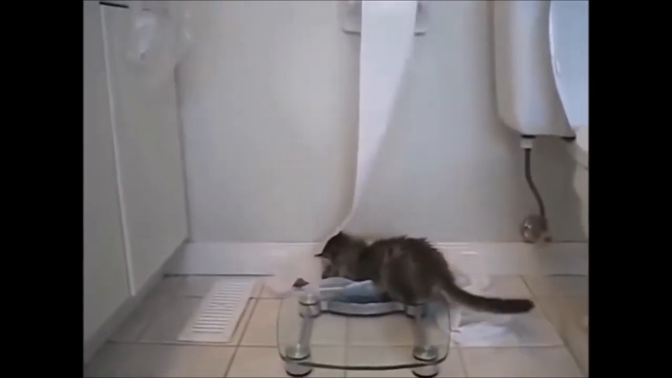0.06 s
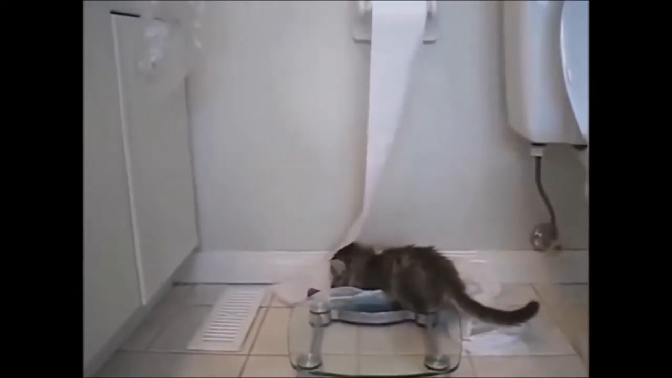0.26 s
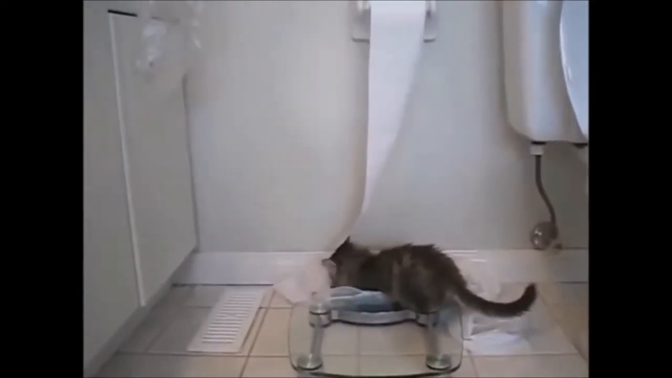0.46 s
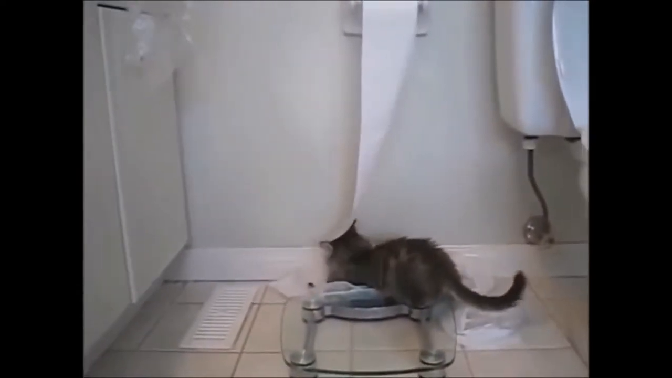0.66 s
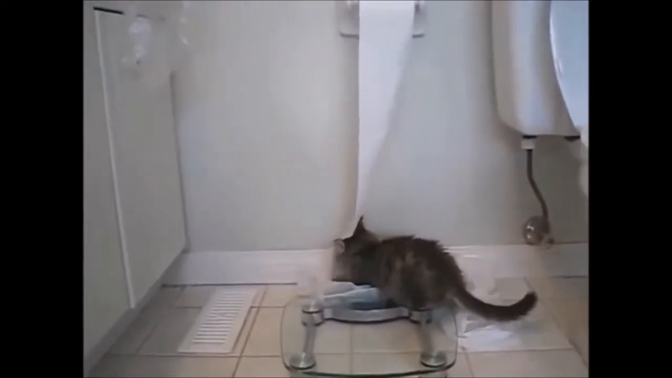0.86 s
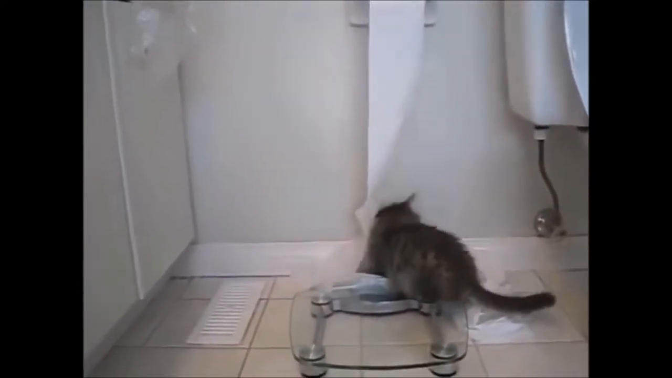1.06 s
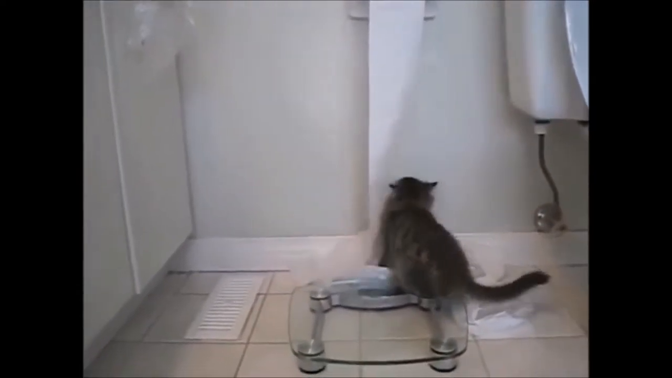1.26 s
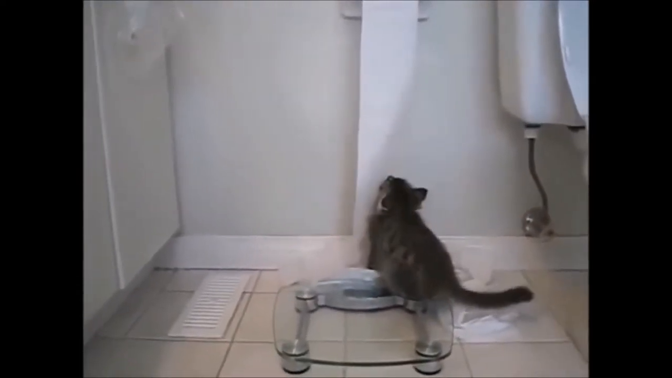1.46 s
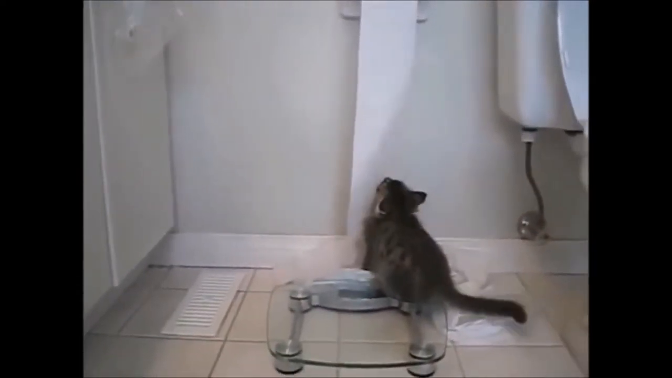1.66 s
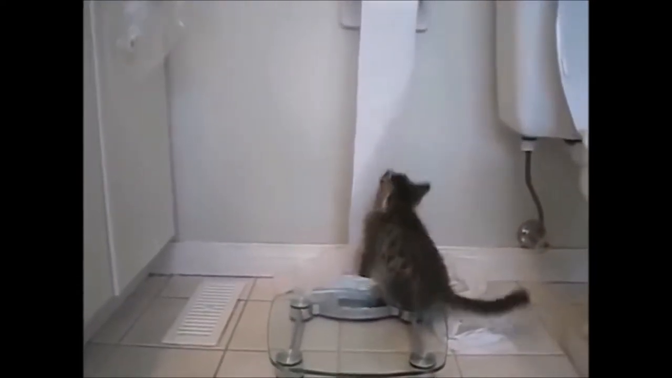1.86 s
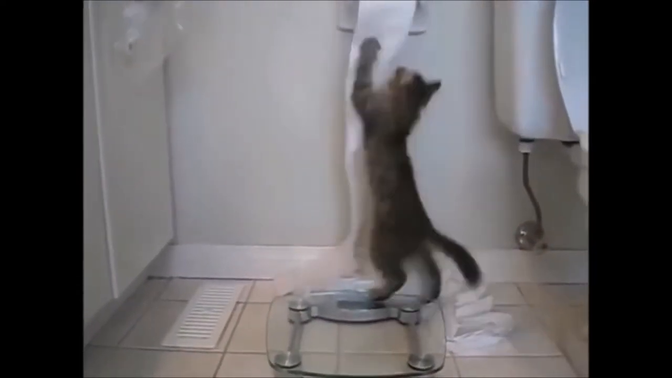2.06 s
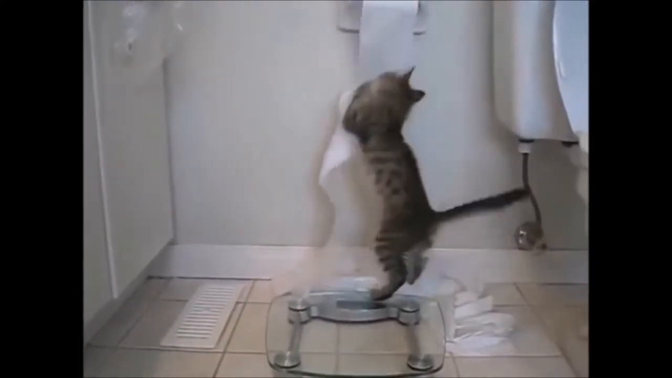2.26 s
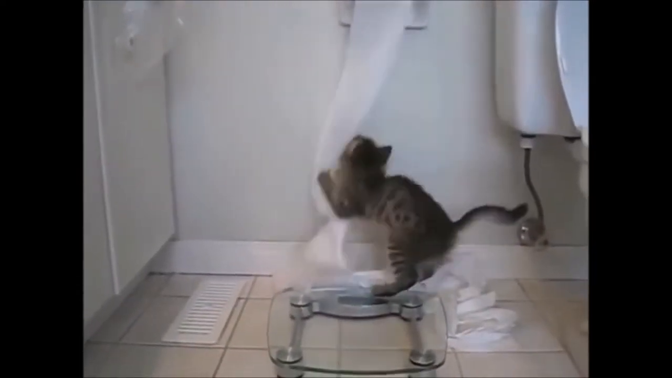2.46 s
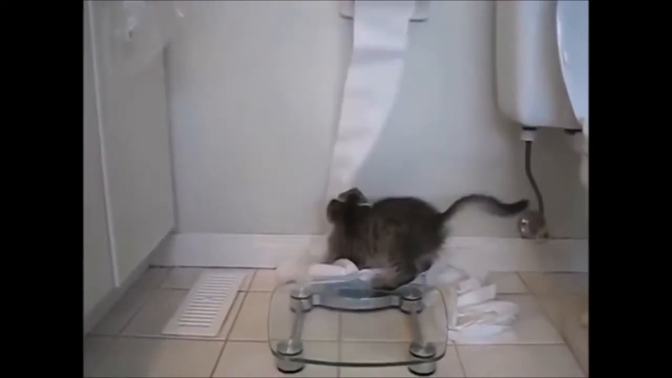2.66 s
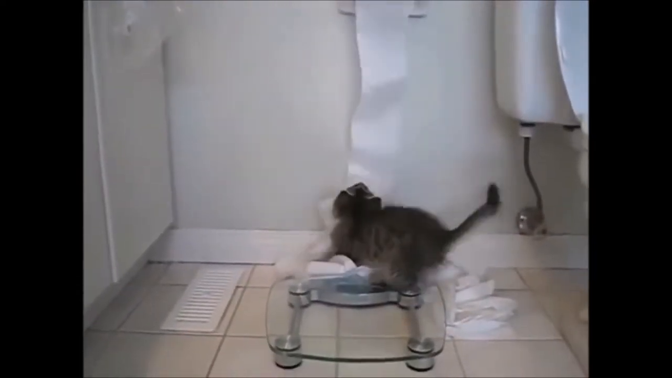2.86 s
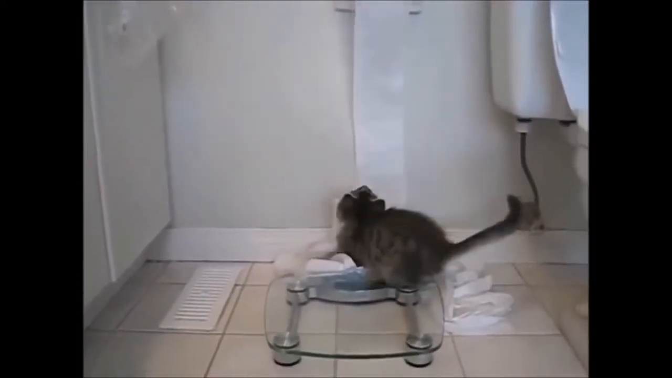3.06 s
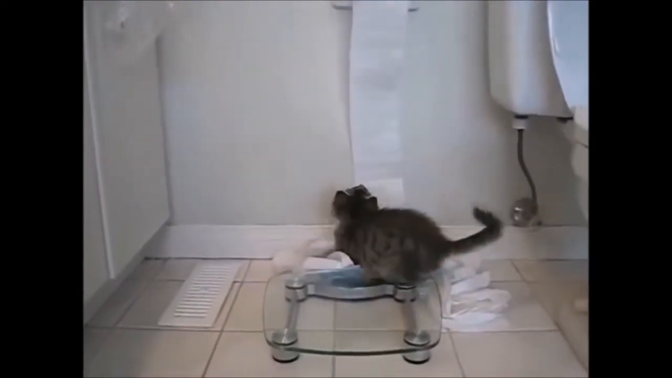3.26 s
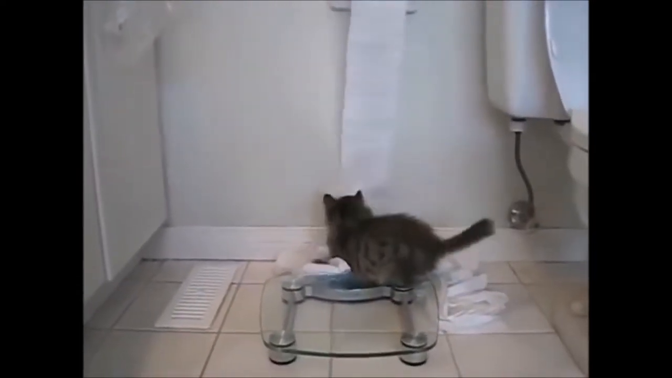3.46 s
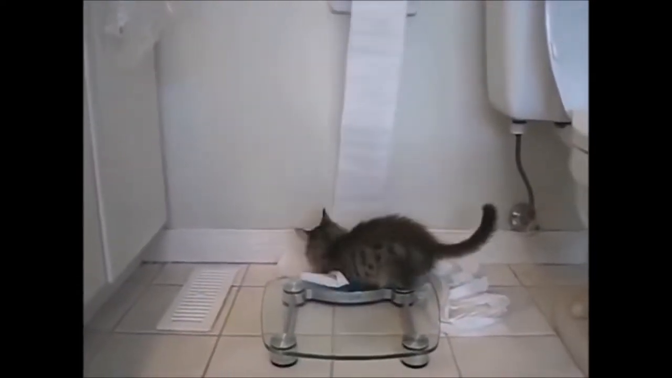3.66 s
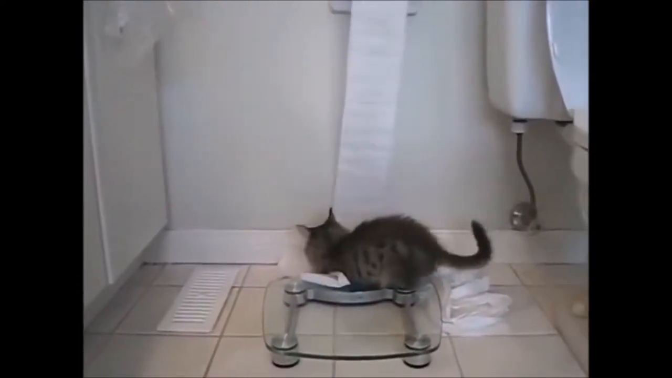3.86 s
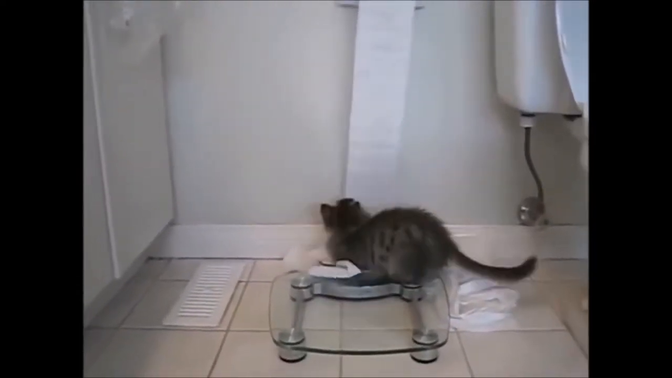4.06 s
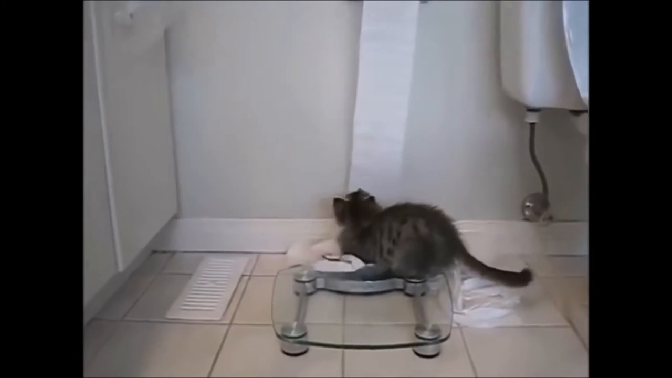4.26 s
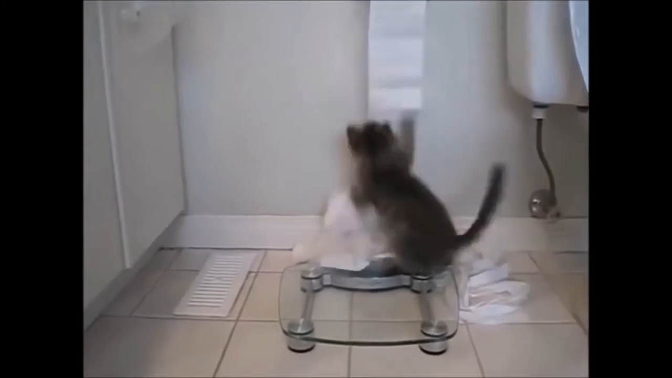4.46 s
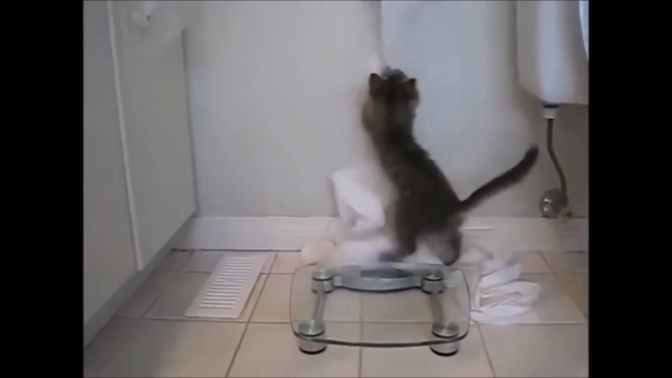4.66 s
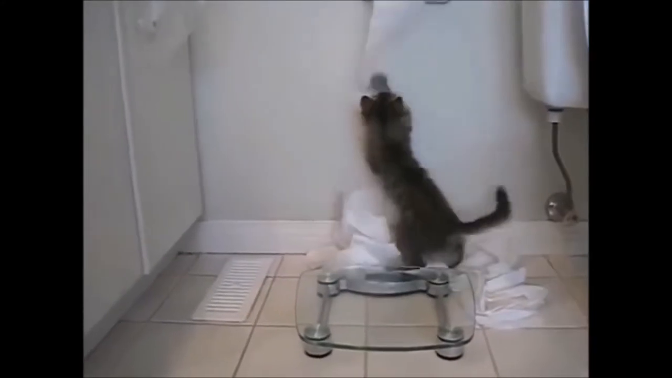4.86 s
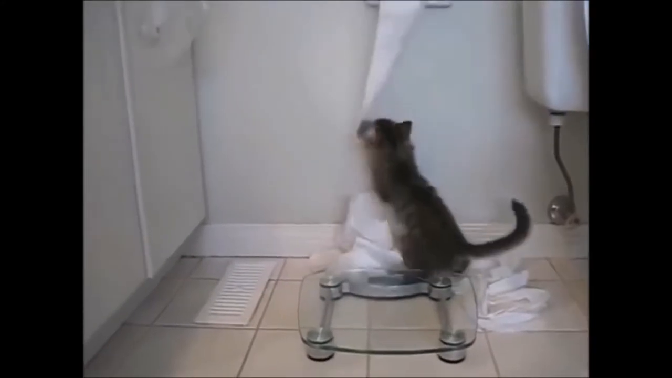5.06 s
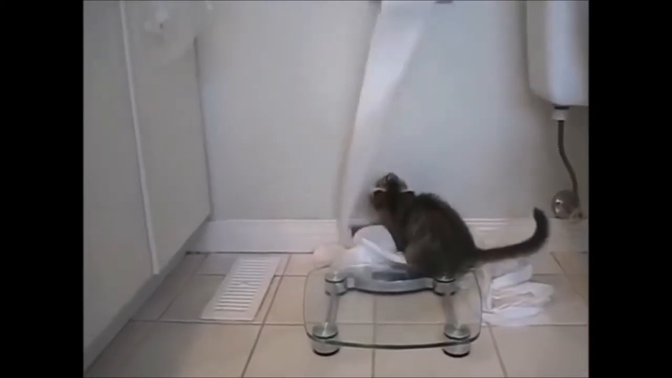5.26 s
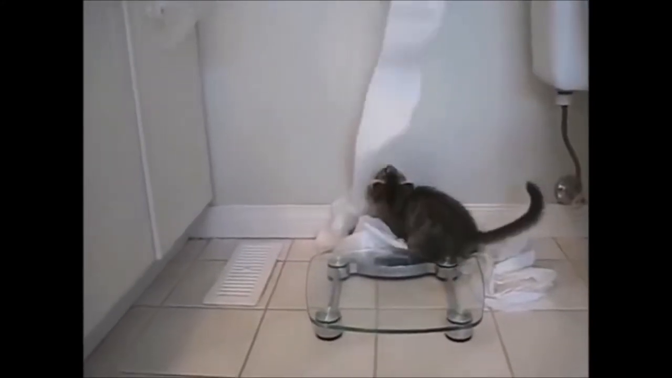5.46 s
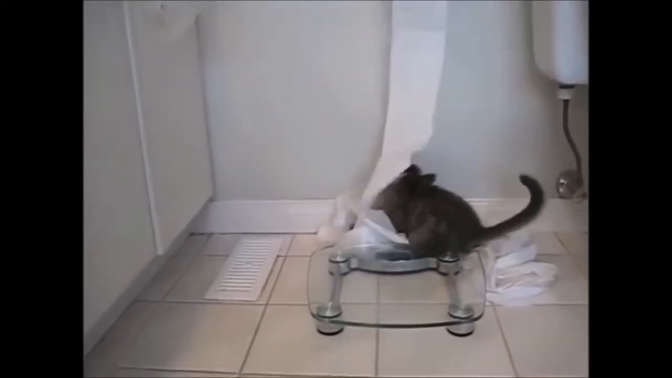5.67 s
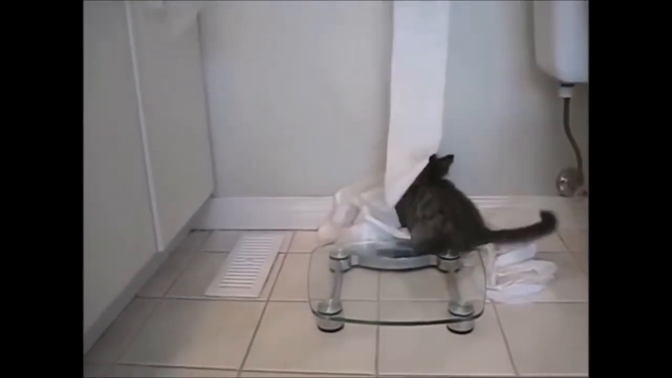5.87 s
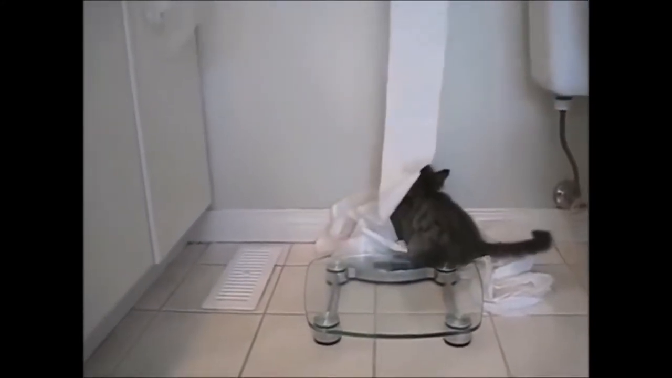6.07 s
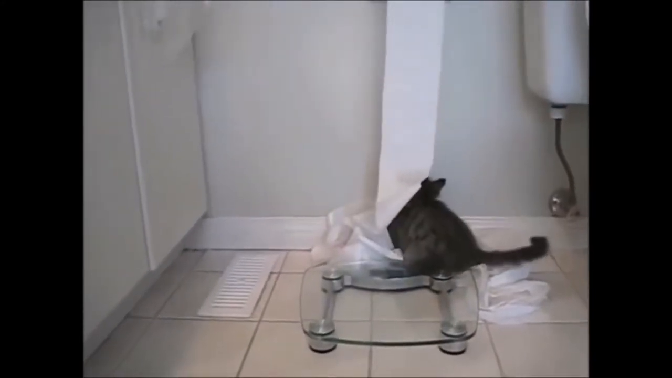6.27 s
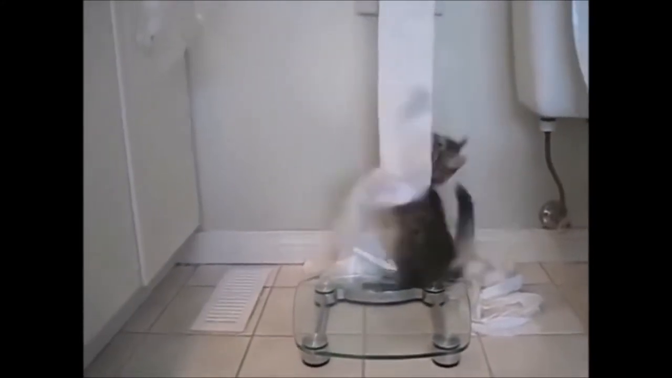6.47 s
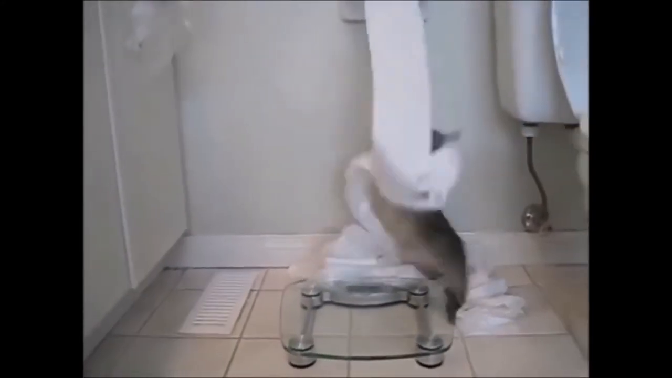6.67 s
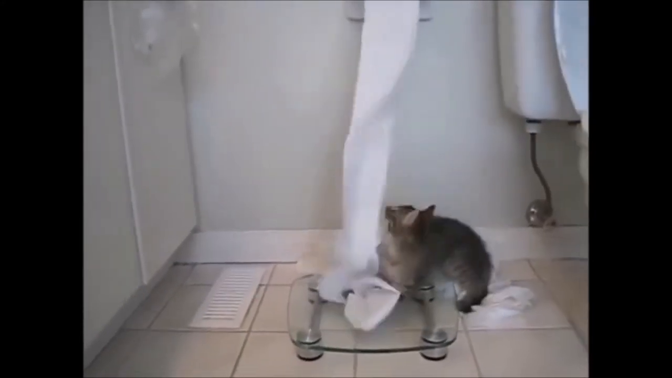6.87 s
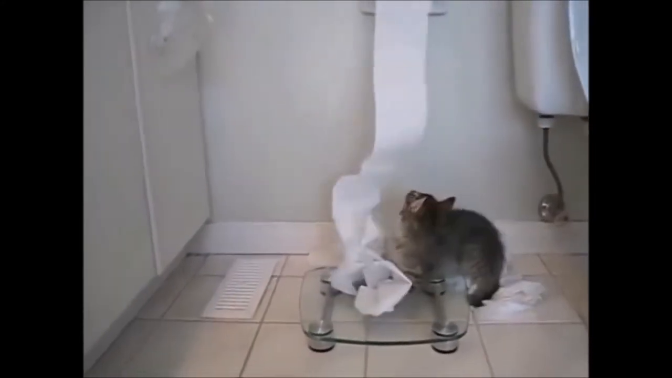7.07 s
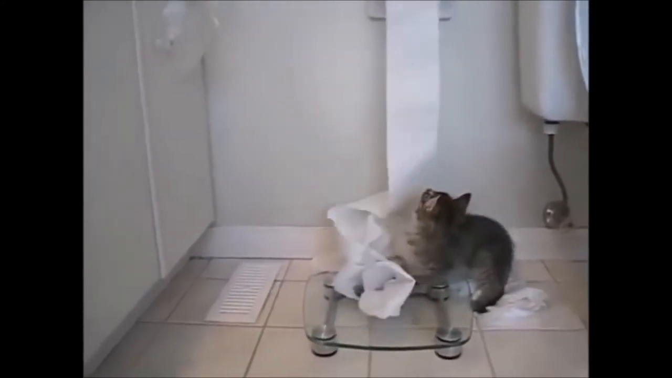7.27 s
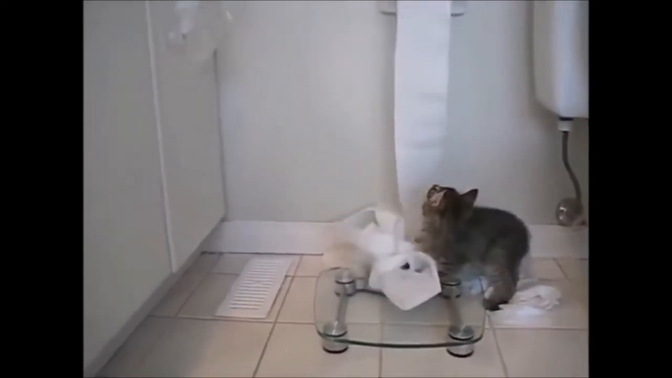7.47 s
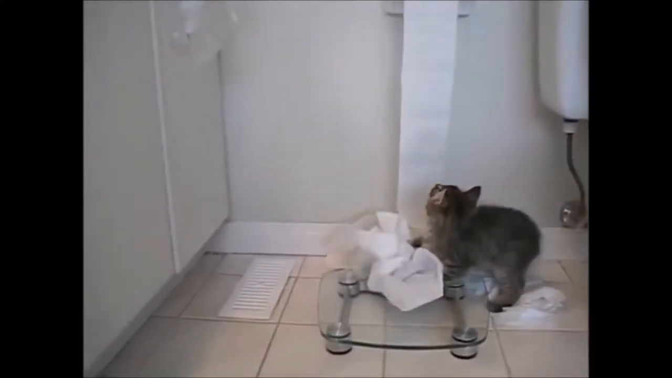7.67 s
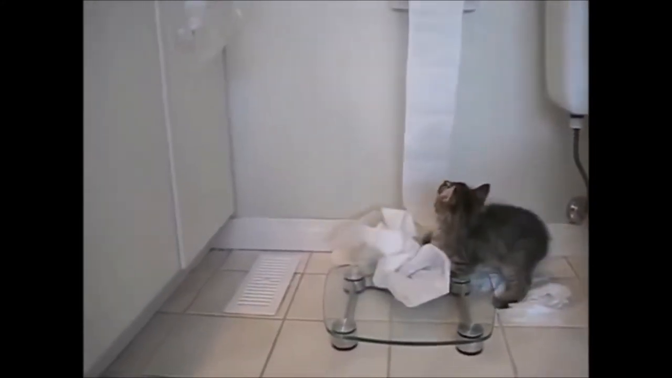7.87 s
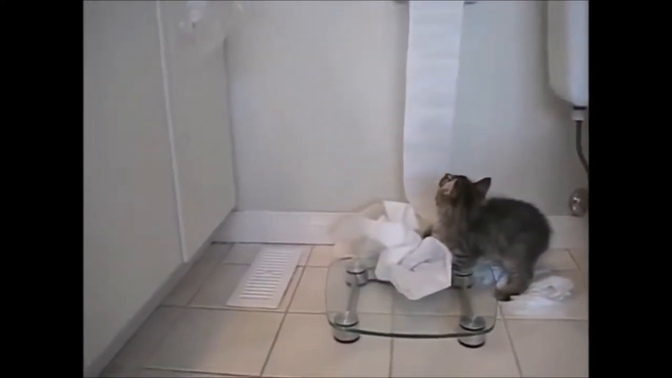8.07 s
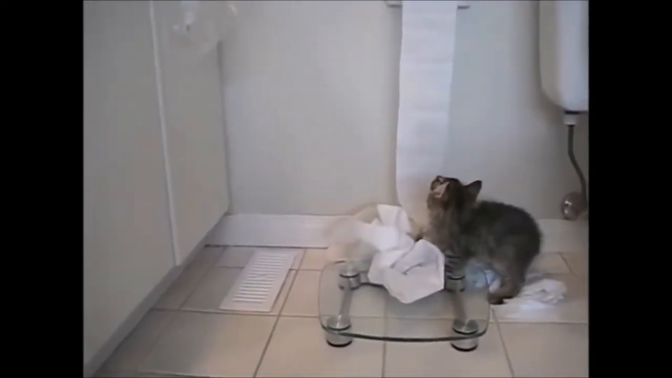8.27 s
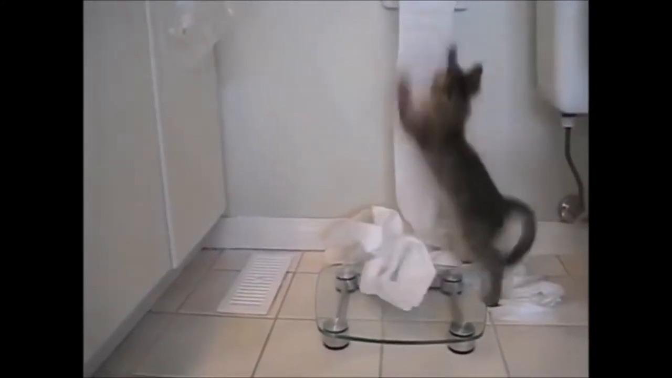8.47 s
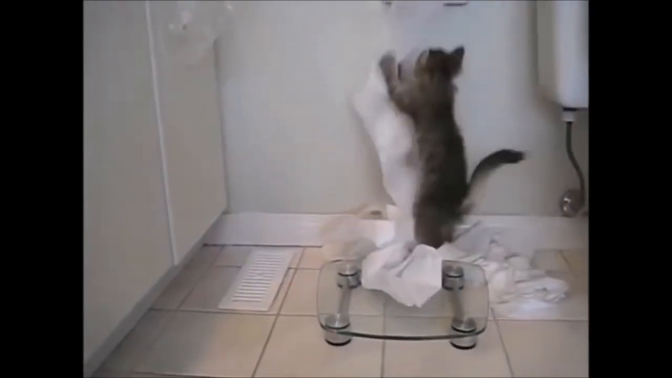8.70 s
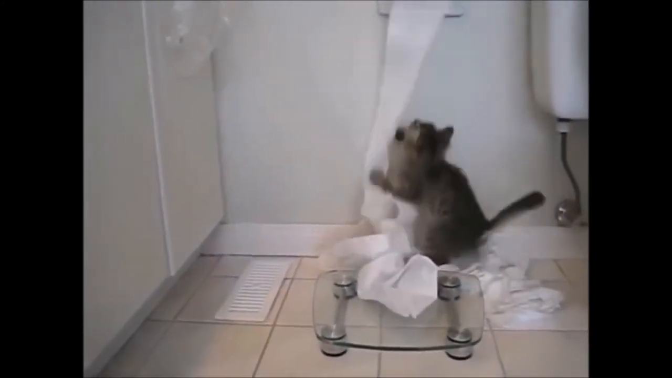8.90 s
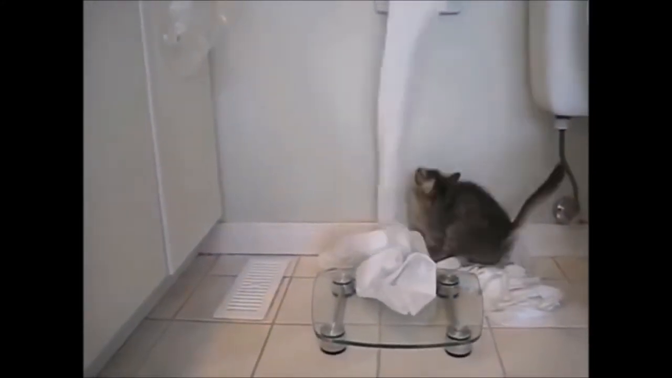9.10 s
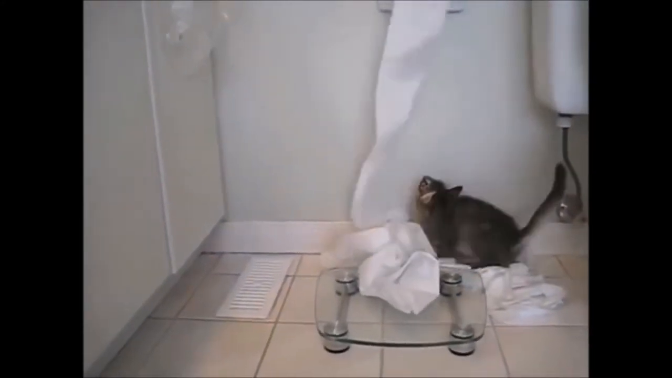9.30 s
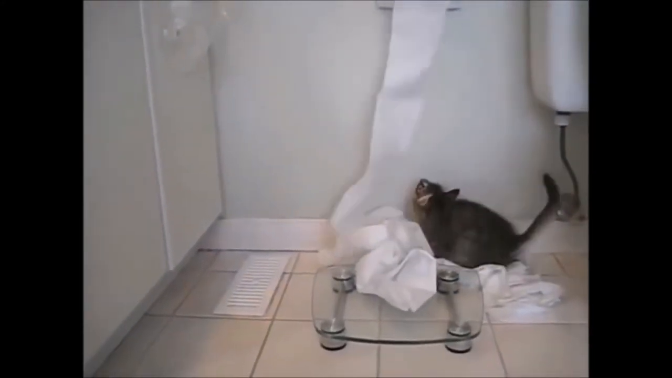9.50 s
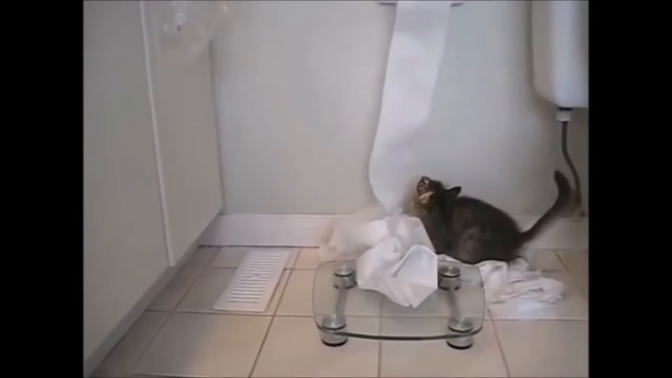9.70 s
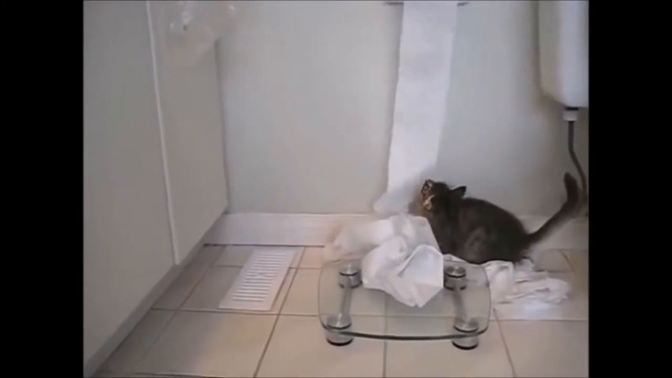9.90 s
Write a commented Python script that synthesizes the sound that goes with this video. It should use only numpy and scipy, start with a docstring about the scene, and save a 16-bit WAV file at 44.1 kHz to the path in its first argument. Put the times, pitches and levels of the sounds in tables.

```python
"""Kitten and toilet roll

A kitten claws toilet paper off its roll in a small tiled bathroom, in mono: filtered noise slides and crinkles
as tissue. At each leap the roll spins and rumbles as lumpy low noise; it knocks, and claws tick on a glass
scale, as dying flurries of clicks. Cardboard and taut paper pop as single decaying sines. Near 7 s a metal
fitting is struck and rings as a sum of modes. Soft paw thuds, a brief faint whine, hiss and a whirr are noise."""
import sys
import numpy as np
from scipy import signal
from scipy.fft import rfft, irfft, next_fast_len
from scipy.io import wavfile
from scipy.ndimage import uniform_filter1d

SR = 44100
rng = np.random.default_rng(int(sys.argv[2]) if len(sys.argv) > 2 else 0)


def dump(signal):
    """Clip the signal to [-1, 1] and save it as 16-bit WAV at the path in sys.argv[1]."""
    limited = np.clip(np.atleast_2d(signal).T, -1, 1)
    pcm = np.round(limited * 32767).astype(np.int16)
    wavfile.write(sys.argv[1], SR, pcm)


N = 438354
TIME, FREQ = np.arange(N) / SR, np.fft.rfftfreq(N, 1 / SR)
STEPS = TIME[::40]  # coarse time grid for slow controls, s

# The effort and fold of a gentle stroke, to which the others are compared
GENTLE_DB, FOLD_HZ = -48, 3000

# Spectrum of rubbed tissue: f/Hz, relative level/dB
TISSUE_SPECTRUM = [(150, -23), (250, -10), (319, -6.5), (493, -4.5), (607, -2), (686, -5), (775, -2),
                   (1220, 0), (1350, 1.5), (1580, -0.5), (2020, 0), (3840, -1.5), (12100, -2), (16000, -11)]
BODY_DB, BODY_DB_PER_OCTAVE = -9.5, -8.5  # body against hiss: a tighter, higher fold sounds thinner


def paper(slide_db=-2, crinkle_db=-8, clump_db=3.0, flutter_db=1.27, unrest=0.078, crisp=0.21,
          snap_db=-7, feed_hiss_db=-7, feed_body_db=-7):
    """Friction noise: fibres slide with a fluttering hiss, crinkle and snap; the turning roll feeds a swish."""
    drag, octaves, fizziness = pull()
    feed = spin()
    rub = np.hypot(drag, amp(feed_hiss_db) * feed)
    effort_db = 20 * np.log10(rub) - GENTLE_DB

    # Harder rubbing flutters more and crinkles louder
    slide = rng.standard_normal(N)
    slide *= amp(np.maximum(flutter_db + unrest * effort_db, 0) * wander(per_s=60))
    crinkle = unit(crackle(per_s=3500, spread_db=2) * amp(clump_db * wander(per_s=130)))
    snaps = amp(snap_db) * crackle(per_s=70, spread_db=3.5)
    drive = slide + (crinkle + snaps) * amp(crinkle_db + crisp * effort_db)

    patched = patches(drive, patchy_db=2.5, centre_hz=FOLD_HZ * 2 ** octaves, favour_db=2.5)
    body, hiss, fizz = registers(patched, TISSUE_SPECTRUM)
    drag_body = drag * amp(BODY_DB + BODY_DB_PER_OCTAVE * octaves)
    body *= np.hypot(drag_body, amp(feed_body_db) * feed)
    fizz *= drag * fizziness
    return amp(slide_db) * (body + rub * hiss + fizz)


# Paw strokes on the sheet, and at 7.846 s a faint swell of whirr: t/s, length/s, relative level at the start/dB,
# relative level at the end/dB, favoured f/Hz (for a stroke, of the rubbing fold), fizz level against the hiss/dB
STROKES = [(-0.1, 0.2, -51, -55, 2800, -12), (0.056, 0.1, -49.5, -46, 3900, -8),
           (0.492, 0.21, -48, -50.5, 4200, -8), (0.698, 0.18, -51, -46, 5800, -3.5),
           (0.866, 0.24, -49, -47, 3830, -8.5), (1.235, .08, -45.5, -43, 3380, -9.5),
           (1.34, .09, -49.5, -49.5, 2400, -8), (1.938, 0.22, -46.5, -57.5, 3000, -8),
           (2.147, 0.29, -44, -53, 3200, -5), (2.448, 0.37, -39, -41.5, 2440, -9),
           (3.435, .13, -48, -43.5, 4300, -6.5), (3.58, .22, -48.5, -50, 2900, -9.5),
           (4.021, 0.22, -48, -50.5, 3200, -9.5), (4.459, 0.29, -47.5, -42, 3700, -8.5),
           (4.757, .1, -41, -37.5, 3280, -9), (4.935, 0.38, -37.5, -42.5, 2720, -9.5),
           (5.267, 0.2, -40.5, -37, 3500, -5.5), (5.516, .19, -44.5, -47.5, 2200, -14),
           (5.776, .21, -55, -51.5, 3600, -5.5), (6.435, 0.16, -45.5, -50.5, 2900, -9),
           (6.582, 0.17, -39.5, -42.5, 2400, -5.5), (6.862, 0.32, -38.5, -40, 2300, -11),
           (7.378, 0.21, -48.5, -43.5, 3720, -8.5), (7.846, 0.17, -67, -71, 1400, -9),
           (8.423, 0.31, -52, -53, 3900, -7), (8.65, 0.2, -45, -39.5, 1900, -12),
           (8.976, 0.14, -49, -43.5, 2400, -8), (9.196, 0.32, -35.5, -50.5, 3300, -7.5),
           (9.512, 0.28, -49, -53.5, 2770, -10)]
# A gentle stroke swells and settles at these rates; both double for every 10 dB of added effort
GENTLE_GRAB_S, GENTLE_SETTLE_DB_PER_S, HASTE_DOUBLING_DB = 0.079, 102, 10


def pull(rest_db=-70, rest_fizz_db=-7):
    """Power addition: drag never quite rests; the strongest row sets fold octaves above FOLD_HZ and fizz gain."""
    power = np.full(len(STEPS), amp(rest_db) ** 2)
    octaves = np.zeros(len(STEPS))
    fizz = power * amp(rest_fizz_db)
    for s, length, grab_db, end_db, hz, fizz_db in STROKES:
        haste = 2 ** (max(grab_db - GENTLE_DB, 0) / HASTE_DOUBLING_DB)
        level = amp(np.interp(STEPS, [s, s + length], [grab_db, end_db]))
        shape = swell(s, GENTLE_GRAB_S / haste, length, GENTLE_SETTLE_DB_PER_S * haste)
        stroke = (level * shape) ** 2
        power += stroke
        octaves += stroke * np.log2(hz / FOLD_HZ)
        fizz += stroke * amp(fizz_db)
    # Power-weighted means let the strongest row lead
    return [per_sample(control) for control in (np.sqrt(power), octaves / power, fizz / power)]


# Spins of the roll: t/s, spin-up/s, driven time/s, relative level/dB, coasting loss/(dB/s)
SPINS = [(2.18, 0.35, .82, -43, 62), (4.8, 0.44, .75, -43.5, 43), (6.55, 0.15, .69, -42.5, 38),
         (7.58, .03, 0.049, -44, 200), (8.65, 0.055, .8, -46, 28), (9.85, 0.021, .1, -44, 50)]


def spin():
    """Rotational inertia: the roll speeds up, is driven by the paws, then coasts down exponentially."""
    turns = [amp(db) * swell(s, up_s, driven_s, coast) for s, up_s, driven_s, db, coast in SPINS]
    return per_sample(sum(turns))


# Spectrum of the rumbling roll: f/Hz, relative level/dB
ROLL_SPECTRUM = [(25, -33), (50, -14), (75, -7.5), (96, 2), (120, -4.5), (158, 4), (200, -2.5), (300, -6),
                 (450, -5.5), (900, -37), (3000, -69.5)]


def roll(level_db=-4, wobble_db=3.5, lump_db=2.5):
    """Repeated impact: the cardboard core tumbles on its spindle and drums on the wall in uneven lumps."""
    bumps = crackle(per_s=450, spread_db=0.0) * amp(wobble_db * wander(per_s=25))
    rumble = unit(colour(bumps, amp(read(ROLL_SPECTRUM, FREQ))))
    return amp(level_db) * spin() * rumble * amp(lump_db * wander(per_s=20))


# Jolts of the roll in its holder: t/s, relative level/dB, brightness/dB, rattle t60/s
KNOCKS = [(0.178, -35, 1, 0.17), (2.231, -28, 1.5, 0.066), (2.3824, -33.5, 2, .12),
          (2.4653, -26.5, -2.5, 0.19), (2.4942, -25, -4, 0.12), (2.537, -24.5, -2, 0.14),
          (2.6534, -18, -1, .09), (2.7656, -28, 0, 0.18), (2.9475, -18.5, 4.5, 0.12),
          (2.9864, -25, -6, 0.098), (3.092, -28, -3.5, 0.053), (5.0852, -23, -3, 0.17),
          (5.3187, -28, -10.5, 0.12), (5.4809, -19, -3, 0.086), (5.5673, -24.5, 1.5, 0.063),
          (5.6421, -31.5, -1, 0.13), (6.648, -27, 5, 0.17), (6.6706, -23, 2, 0.14), (6.6928, -21, 6, 0.064),
          (6.876, -20, 1.5, 0.14), (6.9254, -22.5, 1.5, .08), (6.977, -19.5, 1.5, 0.14),
          (7.115, -18, 2, 0.12), (7.201, -22, 3, .12), (7.3593, -29.5, -2.5, 0.11), (7.595, -18, 4, 0.11),
          (8.6627, -32.5, -7, 0.17), (8.689, -24.5, 4, 0.061), (8.752, -32.5, -14, .12),
          (8.8184, -24, -2, 0.14), (8.9646, -23, -2, 0.15), (8.9834, -27.5, 1, 0.11),
          (9.3078, -20, 0.5, .11), (9.32, -24.5, 5, 0.084), (9.4607, -24.5, 4, 0.094),
          (9.8548, -17.5, 2, 0.095)]
# Spectrum of the holder: f/Hz, relative level/dB
HOLDER_SPECTRUM = [(100, -19.5), (200, -5), (300, -10), (550, -2.5), (750, -5), (900, -10.5), (1350, 4.5),
                   (1520, -0.5), (1780, 4), (2400, 3), (3300, 1.5), (5700, -2), (7000, -7.5),
                   (11500, -10.5), (16000, -25)]


def knocks():
    """Rattling contact: each jolt of the roll in its holder dies away as a flurry of small impacts."""
    rattle = bursts(KNOCKS, HOLDER_SPECTRUM, body_db=-12.5, treble_db=-9, rise_s=0.00091,
                    contacts_per_s=7000, spread_db=1.7, patchy_db=2.5)
    return amp(-7.0) * rattle


# Claws and paper snaps: t/s, relative level/dB, brightness/dB, t60/s
TICKS = [(0.586, -28.5, 2, 0.037), (2.1902, -23.5, 3, 0.041), (2.3555, -33, 0, 0.043),
         (2.8316, -26, 0, 0.018), (2.8426, -22, 3, 0.028), (2.9333, -34, 13, 0.029),
         (2.966, -20.5, 13, .028), (3.176, -33.5, 0, 0.036), (4.6217, -31, -8, 0.028),
         (4.7591, -21, -14.5, 0.018), (4.9698, -39, -6, 0.025), (5.3667, -21, 4, 0.028),
         (5.5488, -22, -1, .028), (6.576, -34, -2, .027), (6.8664, -16, 1, 0.028), (6.9584, -16, 2, 0.03),
         (7.5856, -25, -5, 0.069), (8.8121, -13.5, 7.5, 0.019), (9.0972, -27.5, -4, 0.04),
         (9.187, -28.5, 4, 0.028), (9.2279, -21, 7, .03), (9.5984, -23.5, 5, 0.034),
         (9.7419, -33.5, -13.5, 0.042), (9.9344, -25, 7, .035)]
# Spectrum of a claw: f/Hz, relative level/dB
CLAW_SPECTRUM = [(120, -24), (400, -11), (900, 2), (2000, 2), (4000, 5.5), (6000, 0), (9000, -7.5),
                 (16000, -22)]


def ticks():
    """Hard contact: claws on the glass scale and snaps of paper make short flurries of dense clicks."""
    clicks = bursts(TICKS, CLAW_SPECTRUM, body_db=-17.5, treble_db=-14.5, rise_s=0.00047,
                    contacts_per_s=15000, spread_db=1.5, patchy_db=6.0)
    return amp(-4.0) * clicks


def bursts(rows, spectrum, body_db, treble_db, rise_s, contacts_per_s, spread_db, patchy_db):
    """Impact spectrum: each blow is a dying flurry of contacts; a bright one has less body and more treble."""
    clicks = crackle(contacts_per_s, spread_db)
    contacts = patches(clicks, patchy_db, centre_hz=np.full(N, 2000), favour_db=1.0)
    body, middle, treble = registers(contacts, spectrum)
    out = np.zeros(N)
    for s, db, bright_db, t60 in rows:
        start = round(s * SR)
        span = slice(start, start + SR // 2)
        t = TIME[span] - TIME[span][0]
        # body_db and treble_db stand against the middle register
        flurry = amp(body_db - bright_db) * body[span] + middle[span]
        flurry += amp(treble_db + bright_db) * treble[span]
        decay = amp(db - 60 * t / max(t60, .004))
        add(out, s, flurry * decay * (1 - np.exp(-t / rise_s)))
    return out


# Hollow knocks that ring on one pitch: t/s, relative level/dB, f/Hz, t60/s
POPS = [(2.19, -31, 990, 0.035), (2.231, -37, 960, 0.035), (2.951, -29.5, 1386, 0.085),
        (4.758, -25, 1440, 0.02), (4.968, -23.5, 990, 0.02), (5.089, -32.5, 1350, 0.11),
        (5.324, -38, 730, 0.068), (5.508, -39, 770, 0.14), (6.671, -16.5, 960, 0.024),
        (6.695, -28, 1120, 0.044), (6.838, -30.5, 1300, .08), (8.751, -34, 1246, .05),
        (8.753, -36, 620, 0.058), (9.311, -32, 1708, 0.12)]


def pops(level_db=1, rise_s=0.00042, sway_rad=0.36):
    """Damped resonance: cardboard and taut paper ring briefly, unsteady in pitch."""
    out, t = np.zeros(N), TIME[:SR // 4]
    sway = sway_rad * wander(per_s=250)
    for s, db, hz, t60 in POPS:
        phase = sway[round(s * SR):].take(np.arange(len(t)), mode="wrap")
        ring = np.sin(2 * np.pi * hz * t + phase)
        add(out, s, amp(db) * ring * ring_shape(t, t60, rise_s))
    return amp(level_db) * out


# Blows on the metal fitting: t/s, relative level/dB, most excited f/Hz, spread/octave
CLANKS = [(6.832, -16, 2330, .06), (6.959, -12, 4340, 0.054), (6.978, -16, 1806, 2.3)]
# Modes of the fitting as heard in the room: f/Hz, relative level/dB, t60/s, rise time constant/s
METAL_MODES = [(595, 1.5, 0.51, 0.045), (566, 0.5, 0.19, .03), (633, -1.5, 0.23, .03),
               (658, -7.5, 0.26, 0.0099), (1587, -6, 0.42, .001), (2310, -15, 0.13, .001),
               (2980, -3, 0.23, .0005), (3000, -8, 0.058, .0005), (3030, -13, .14, 0.000464),
               (3540, -18.5, 0.3, .0005), (4510, -16, 0.26, .0005), (4748, -16, .33, .0005),
               (4829, -21, .33, .0005)]


def fitting(chatter_db=3.0):
    """Modal synthesis: a blow picks modes, low ones peak later, as heard in the room; the loose mount chatters."""
    out, t = np.zeros(N), TIME[:SR]
    chatter = amp(chatter_db * wander(per_s=140))
    for k, (hz, mode_db, t60, rise_s) in enumerate(METAL_MODES):
        ring = np.sin(2 * np.pi * hz * t) * ring_shape(t, t60, rise_s)
        ring *= chatter[k * SR // 2:][:SR]  # each mode starts half a second further into the chatter
        for s, db, centre_hz, spread in CLANKS:
            excitation = np.exp(-.5 * (np.log2(hz / centre_hz) / spread) ** 2)
            add(out, s, amp(db + mode_db) * excitation * ring)
    return out


# Soft paw blows on the floor: t/s, relative level/dB, t60/s
THUDS = [(0.178, -36, 0.077), (0.191, -36, 0.083), (0.586, -47, 0.09), (2.186, -45, 0.2),
         (4.615, -44.5, 0.11), (4.757, -42, 0.092), (8.68, -39, 0.092), (8.752, -34, 0.13)]
# Spectrum of a paw blow: f/Hz, relative level/dB
PAW_SPECTRUM = [(50, -15), (130, -7.5), (200, 0), (270, 1), (370, -22), (520, 5), (720, -21), (1000, 3.5),
                (1500, -40), (5000, -50)]


def paws(rise_s=0.0019):
    """Damped impact: a padded blow is a dull puff of low noise with no ring."""
    push, t = np.zeros(N), TIME[:SR // 2]
    for s, db, t60 in THUDS:
        add(push, s, amp(db) * ring_shape(t, t60, rise_s))
    return push * unit(colour(rng.standard_normal(N), amp(read(PAW_SPECTRUM, FREQ))))


# A faint whine that comes and goes: t/s, length/s, level/dB
WHINES = [(6.1, .25, -72), (7.78, 0.36, -66.5)]


def whine(centre_hz=1634, half_width_hz=40, rise_s=.1, fade_db_per_s=90):
    """Narrow-band resonance: noise around one pitch swells and fades."""
    swells = [amp(db) * swell(s, rise_s, length, fade_db_per_s) for s, length, db in WHINES]
    return per_sample(sum(swells)) * unit(colour(rng.standard_normal(N), resonance(centre_hz, half_width_hz)))


# Spectrum of the quiet hiss: f/Hz, relative level/dB
QUIET_SPECTRUM = [(15, -39), (25, -6.5), (229, -12.5), (301, -4.5), (373, -14), (575, -16.5), (775, -23),
                  (911, -1.5), (1230, -15.5), (1440, -17.5), (2220, -21), (7710, -25.5), (16000, -34.5)]
# Resonances of the steady whirr: f/Hz, half-width at half gain/Hz, level/dB
WHIRR = [(305, 19, -70.5), (907, 85, -67), (1030, 350, -73.5)]


def background(hiss_db=-59.5):
    """Stationary noise: a soft hiss, and a whirr of noise in a few narrow resonances."""
    hiss = unit(colour(rng.standard_normal(N), amp(read(QUIET_SPECTRUM, FREQ))))
    out = amp(hiss_db) * hiss
    air = rng.standard_normal(N)
    for hz, half_width, db in WHIRR:
        out += amp(db) * unit(colour(air, resonance(hz, half_width)))
    return out


# Decay of the tiled room: f/Hz, t60/s
ROOM_T60 = [(150, 0.88), (400, 0.4), (1000, 0.52), (2800, 0.72), (7000, 0.73), (15000, 0.55)]
# Echo spectrum of the room: f/Hz, relative level/dB
ROOM_SPECTRUM = [(150, 9), (700, 4), (2000, 0.5), (6000, -4.5), (15000, -6)]


def room(x, wet_db):
    """Statistical reverberation: direct sound plus dense echoes off tile, each band dying at its own speed."""
    taps = rng.standard_normal(SR) * (rng.random(SR) < 4000 / SR)  # about 4000 echoes per second
    taps[:SR // 250] = 0  # no echo in the first 4 ms
    hz, t, z = signal.stft(taps, SR, nperseg=256)
    decay = amp(-60 * t / read(ROOM_T60, hz)[:, None])
    decay_rms = np.sqrt(np.mean(decay ** 2, axis=1, keepdims=True))
    decay *= amp(read(ROOM_SPECTRUM, hz))[:, None] / decay_rms
    tail = signal.istft(z * decay, SR, nperseg=256)[1] / np.linalg.norm(taps)
    return x + amp(wet_db) * signal.oaconvolve(x, tail)[:N]


def patches(x, patchy_db, centre_hz, favour_db, width=0.65):
    """Time-varying filtering: brief random spectral patches under a broad hump (width in octaves)."""
    hz, t, z = signal.stft(x, SR, nperseg=512)
    grain = uniform_filter1d(rng.standard_normal(z.shape), size=4, axis=0)
    patch = unit(uniform_filter1d(grain, size=7, axis=1))
    octaves = np.log2((hz[:, None] + 1) / np.interp(t, TIME, centre_hz))
    hump = np.exp(-.5 * (octaves / width) ** 2)
    gain = amp(patchy_db * patch + favour_db * (hump - .5))
    return signal.istft(z * gain, SR, nperseg=512)[1][:N]


# Crossovers between body, middle and treble: f/Hz
SPLIT_HZ = (900, 5500)


def registers(x, spectrum):
    """Band splitting: body, middle and treble of a coloured sound, each at rms 1."""
    low, high = (1 / (1 + (FREQ / hz) ** 6) for hz in SPLIT_HZ)
    shares = (low, high - low, 1 - high)
    return [unit(colour(x, amp(read(spectrum, FREQ)) * share)) for share in shares]


def crackle(per_s, spread_db):
    """Random impulse process: clicks at chance moments, mostly small and a few large, at rms 1."""
    size = amp(spread_db * np.minimum(rng.exponential(1, N), 4))
    return unit(size * rng.choice([-1, 1], N) * (rng.random(N) < per_s / SR))


def wander(per_s):
    """Random modulation: chance values per_s times a second, joined by lines, at rms 1."""
    knots = rng.standard_normal(8000)
    return unit(np.interp(TIME * per_s, np.arange(len(knots)), knots))


def swell(s, rise_s, length, fade_db_per_s):
    """Envelope on STEPS: a smooth rise from time s, with an exponential fade once its length is over."""
    t = STEPS - s
    rise = np.sin(np.pi / 2 * np.clip(t / rise_s, 0, 1)) ** 2
    return rise * amp(-fade_db_per_s * np.maximum(t - length, 0))


def ring_shape(t, t60, rise_s):
    """Exponential damping: a 60 dB decay in t60 seconds behind an onset of time constant rise_s."""
    return np.exp(-np.log(1000) * t / t60) * (1 - np.exp(-t / rise_s))


def resonance(hz, half_width):
    """Resonance curve: gain on FREQ that halves at half_width from its centre."""
    return 1 / (1 + ((FREQ - hz) / half_width) ** 2)


def colour(x, gain):
    """Linear filtering: multiplies the spectrum of x by a gain given on FREQ."""
    size = next_fast_len(N, True)
    size_gain = np.interp(np.fft.rfftfreq(size, 1 / SR), FREQ, gain)
    return irfft(rfft(x, size) * size_gain, size)[:N]


def read(points, hz):
    """Logarithmic pitch scale: interpolates a table along log frequency."""
    f, value = np.transpose(points)
    return np.interp(np.log(hz + 1), np.log(f + 1), value)


def per_sample(control):
    """Linear interpolation: joins a slow control given on STEPS."""
    return np.interp(TIME, STEPS, control)


def amp(db):
    """Level law: decibels to amplitude gain."""
    return 10 ** (np.asarray(db) / 20)


def unit(x):
    """Root-mean-square normalisation to 1."""
    return x / np.sqrt(np.mean(x ** 2) + 1e-20)


def add(mix, s, sound):
    """Superposition: adds a sound into the mix at time s."""
    part = mix[max(round(s * SR), 0):][:len(sound)]
    part += sound[:len(part)]


def scene():
    """Superposition of all sources, most of them in the tiled room, the same in both channels."""
    knocking, ticking = knocks(), ticks()
    mono = room(paper(), wet_db=-8)
    mono += room(roll() + paws(), wet_db=-6)
    mono += room(knocking, wet_db=-1.5)
    mono += room(ticking, wet_db=-1.5)
    mono += room(pops(), wet_db=-6.0)
    mono += room(fitting(), wet_db=-17.0)
    mono += background()
    mono += whine()
    return np.array([mono, mono])


def record(dry, edge_hz=15900):
    """Band limiting: a steep linear-phase low-pass at the edge of the camera's band."""
    lowpass = signal.firwin(511, edge_hz, window=("kaiser", 9), fs=SR)
    return signal.oaconvolve(dry, lowpass[None], "same", axes=1)


dry = scene()
out = record(dry)
dump(out)
```